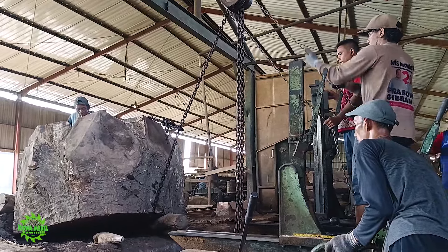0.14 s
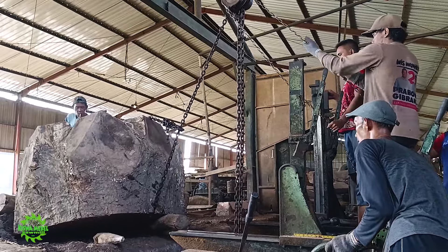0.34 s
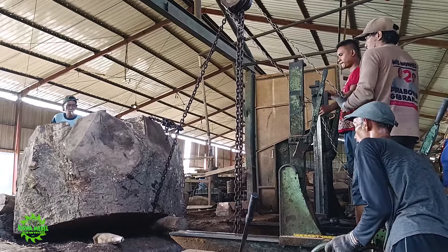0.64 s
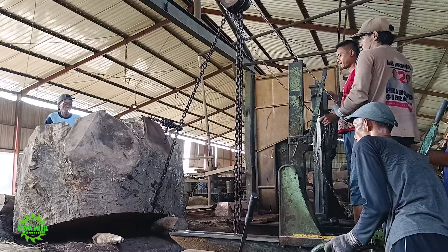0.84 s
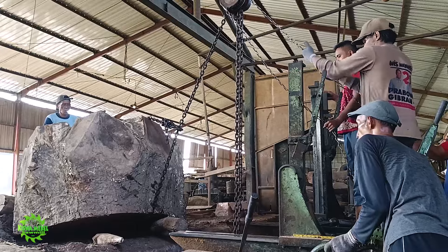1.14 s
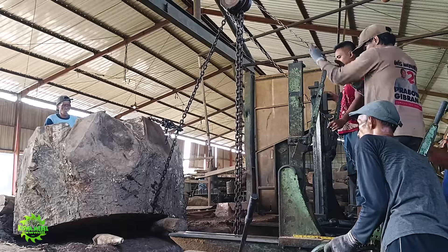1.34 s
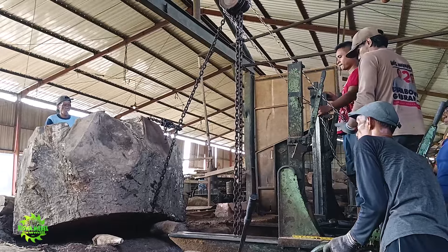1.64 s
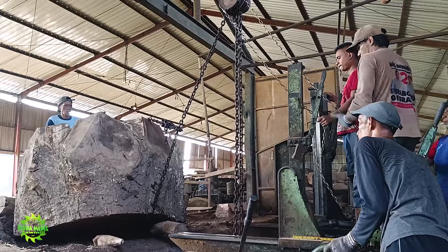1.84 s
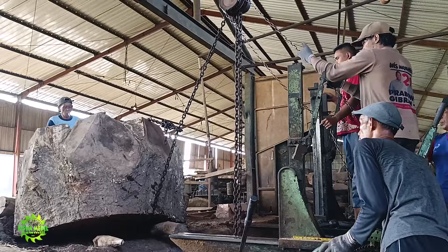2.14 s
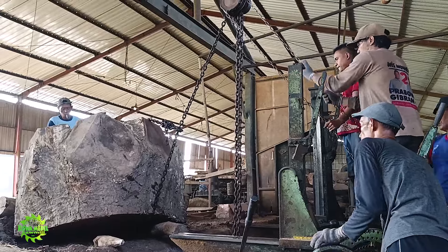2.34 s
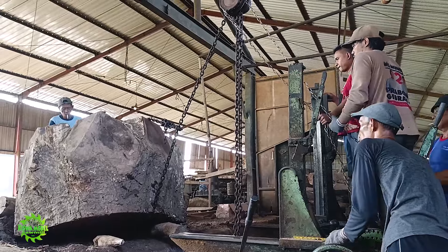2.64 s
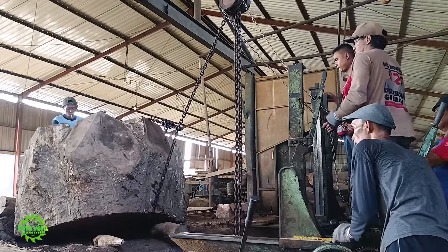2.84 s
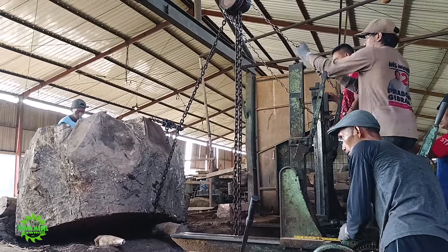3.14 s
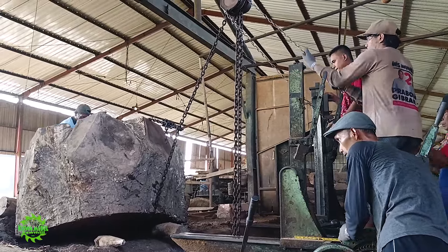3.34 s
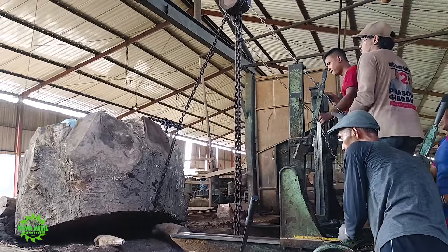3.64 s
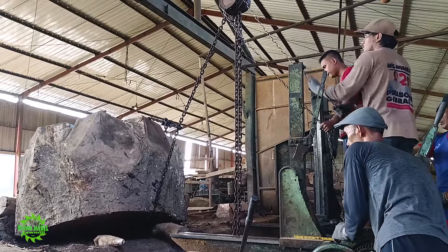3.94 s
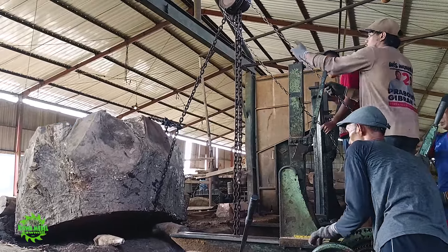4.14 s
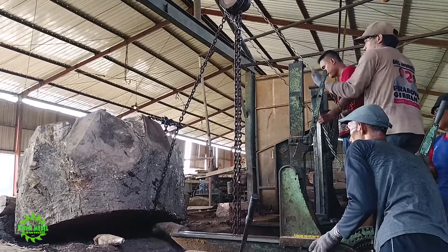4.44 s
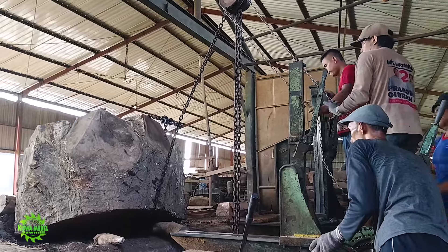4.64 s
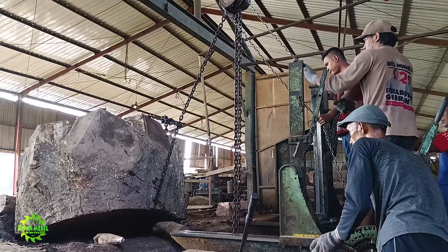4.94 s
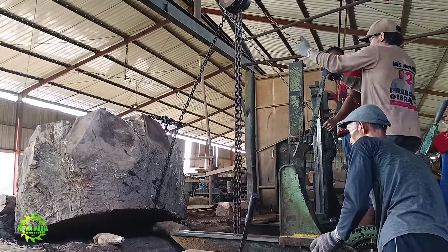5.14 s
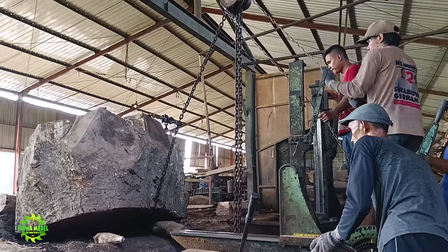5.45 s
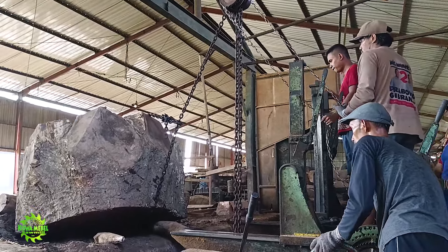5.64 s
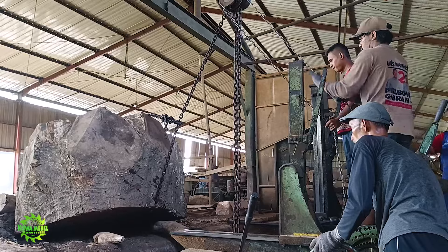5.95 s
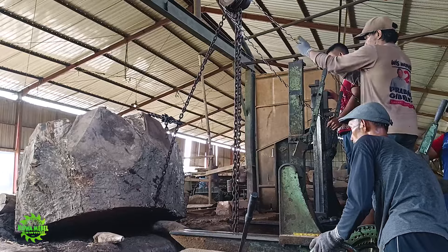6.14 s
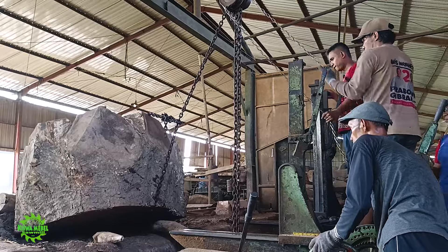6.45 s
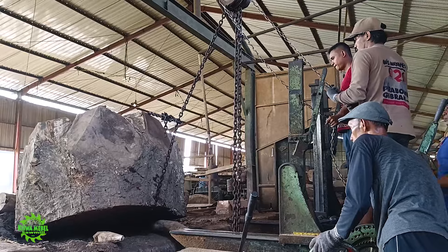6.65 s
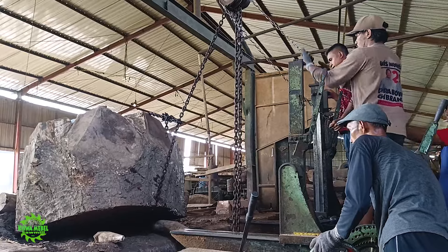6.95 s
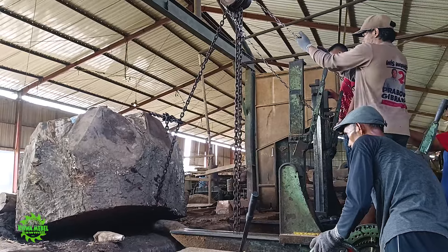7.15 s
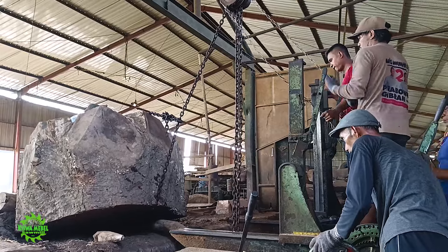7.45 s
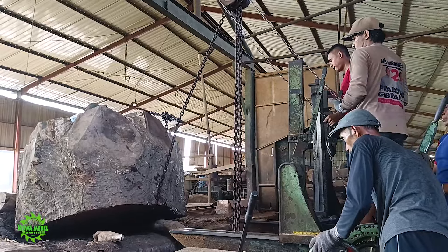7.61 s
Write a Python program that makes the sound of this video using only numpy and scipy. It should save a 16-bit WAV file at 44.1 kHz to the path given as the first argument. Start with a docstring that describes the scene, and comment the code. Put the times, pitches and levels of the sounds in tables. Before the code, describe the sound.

A steel chain rattles through a hand hoist in eight even pulls, roughly a second apart. Each burst of clatter trails off in clinking loose links and a short gear rumble, with a slight echo from the shed. A faint, very high hiss flares now and then over the low hum of mill machines, and three quick ticks come close on the right late on.

```python
"""In an open sawmill shed, a worker hauls the hand chain of a hoist once a second to lift a big log.
The links clatter over the wheel and shake its steel housing, the slack chain jingles and clinks between
pulls, and the gears rumble on after each pull. A thin, high hiss comes and goes, machines hum low,
and three sharp ticks sound right beside the right microphone."""
import sys
import numpy as np
from scipy import signal
from scipy.fft import rfft, irfft, next_fast_len
from scipy.io import wavfile
from scipy.ndimage import uniform_filter1d, map_coordinates

SR = 44100
rng = np.random.default_rng(int(sys.argv[2]) if len(sys.argv) > 2 else 0)


def store_wav(level_fs):
    """Save 16-bit WAV to argv[1]."""
    pcm = np.round(np.clip(np.atleast_2d(level_fs), -1, 1) * 32767)
    wavfile.write(sys.argv[1], SR, pcm.T.astype(np.int16))


N = 343098

# pulls on the hand chain: start_s, length_s, clatter_db, jingle_db, rumble_db, grab_db
HAULS = [(-0.644, .335, -23, -22.5, -29.5, -49), (0.37, .30, -20, -22.5, -31, -51),
         (1.298, .40, -21, -24, -32.5, -51.5), (2.332, .31, -23, -24, -28.5, -43.5),
         (3.325, .285, -21.5, -24, -30.5, -53.5), (4.311, .30, -21, -24, -32.5, -50),
         (5.306, .37, -21.5, -24, -31.5, -43), (6.288, .26, -21.5, -23.5, -31, -51),
         (7.27, .25, -20, -22, -31.5, -43.5)]


def chain():
    """The running chain and its knocks shake the housing and ring the links; the slack rings longer."""
    # single knocks of the chain on the hoist: time_s, housing_db, links_db
    knocks = [(0.121, -43.0, -45.0), (0.187, -31.0, -36.0), (0.309, -24.0, -32.0), (0.428, -18.5, -33.0),
              (0.589, -12.0, -30.5), (0.722, -18.0, -32.5), (0.872, -30.0, -26.0), (1.102, -30.0, -30.0),
              (1.265, -30.0, -38.0), (1.361, -17.5, -26.0), (1.551, -14.0, -32.5), (1.625, -13.0, -24.5),
              (2.086, -34.0, -41.5), (2.193, -24.0, -39.5), (2.375, -20.0, -24.5), (2.6, -16.0, -22.5),
              (2.775, -16.0, -28.5), (3.113, -24.0, -31.5), (3.306, -31.5, -37.0), (3.39, -29.0, -31.0),
              (3.473, -15.0, -24.5), (3.768, -22.5, -22.0), (4.147, -28.5, -35.0), (4.273, -27.0, -32.5),
              (4.303, -22.0, -26.5), (4.324, -25.0, -26.0), (4.387, -22.0, -27.5), (4.433, -14.0, -25.5),
              (4.645, -17.0, -18.5), (4.969, -37.5, -41.5), (5.163, -31.0, -37.5), (5.242, -22.0, -24.0),
              (5.334, -17.5, -23.5), (5.443, -13.0, -27.5), (5.647, -13.0, -21.5), (5.882, -33.5, -32.0),
              (6.083, -38.0, -41.0), (6.196, -29.5, -49.5), (6.304, -26.0, -30.0), (6.372, -18.0, -24.5),
              (6.507, -14.0, -22.5), (6.63, -17.0, -29.5), (6.884, -38.0, -39.0), (7.077, -34.5, -48.0),
              (7.214, -29.0, -39.5), (7.255, -15.5, -24.0), (7.326, -19.5, -24.5), (7.371, -16.0, -27.5)]
    # the slack swings against itself as a pull ends: time_s, clash_db, ring_db
    swings = [(0.761, -27, -29.5), (0.847, -32.5, -34.5), (1.674, -30, -30), (1.719, -20, -18.5),
              (2.709, -24, -30), (2.757, -23.5, -28.5), (3.706, -25, -26.5), (5.68, -20.5, -25.5),
              (6.615, -22, -30), (7.564, -19.5, -23.5), (7.619, -25.5, -27.5)]
    # ringing notes of the steel housing: pitch_hz, width_hz, level_db
    housing_notes = [(462.5, 31, -1), (513.7, 28.2, 3.5), (596.4, 52, -2.5), (739, 86, -3.5),
                     (858, 63, -.5), (1113, 71, -3.5), (1183, 33, -4), (1269, 76, -1), (1579, 100, -8),
                     (1755, 60, -10)]
    # of the chain guide beside the wheel: pitch_hz, width_hz, level_db
    guide_notes = [(1812, 47, -3), (2159, 96, 1), (2376, 47, 1.5), (2683, 63, 0), (3420, 78, -6.5)]
    # of the free-hanging links: pitch_hz, width_hz, level_db
    slack_notes = [(3255, 72, 3), (3448, 69, -2), (3775, 49, -3), (4840, 39, -11.5), (5360, 60, -4.5),
                   (6500, 46, -10.5), (6730, 27, 2), (6900, 28, -7), (7400, 36, -3.5), (8390, 40, -20),
                   (8540, 24, -11), (9230, 46, -8.5), (10660, 50, -17)]
    knock_s, housing_db, links_db = np.transpose(knocks)
    swing_s, clash_db, ring_db = np.transpose(swings)
    clatter_db, jingle_db = chain_motion()
    beat = link_beat(clatter_db, links_per_second=42, scatter=.35, spread_db=1.0, fade_s=0.14, scrape=0.23)
    # each knock shakes the housing and rings the links, over the running chain's clatter
    clatter = np.hypot(amp(clatter_db) * beat, bursts(knock_s, amp(housing_db), fade_s=0.055))
    clash = bursts(swing_s, amp(clash_db), fade_s=0.16)
    slack_ring = bursts(swing_s, amp(ring_db), fade_s=0.2)
    rise_s = 0.002  # a knock passes from link to link, so it starts softly
    lag = np.exp(-1 / (rise_s * SR))
    knock = signal.lfilter([1 - lag], [1, -lag], bursts(knock_s, amp(links_db), fade_s=0.095))
    jingle = np.sqrt((amp(jingle_db) * beat ** 0.75) ** 2 + knock ** 2 + clash ** 2)
    slack_level = np.hypot(slack_ring, amp(-16) * jingle)
    housing = resonate(clatter * contacts(per_second=5000, spread_db=2.5), housing_notes)
    guide = resonate(amp(-6.5) * jingle * contacts(per_second=3000, spread_db=4), guide_notes)
    slack = resonate(slack_level * contacts(per_second=2500, spread_db=7), slack_notes)
    links = link_ring(jingle * contacts(per_second=6000, spread_db=5), fade_s=0.056, ring_db=-2.5)
    return housing + guide + slack + links


def chain_motion():
    """Clatter and jingle levels in dB: the hand grabs the slack and pulls; the chain never quite rests."""
    # how the wheel follows a pull: delay_s, rise_s, run_on_s, fall_db_per_s
    wheel_timing = (-0.013, 0.114, -0.017, 92)
    # how the swaying links follow it: delay_s, rise_s, run_on_s, fall_db_per_s
    link_timing = (0.0, 0.093, -0.017, 90)
    idle_clatter_db, idle_jingle_db, sway_db = -51, -64, 2.5
    grab_lead_s, grab_width_s, grab_clatter_db = 0.012, 0.112, 3.5
    starts, _, clatter_db, jingle_db, _, grab_db = np.transpose(HAULS)
    t = np.arange(N) / SR
    grab = sum(amp(db) * np.exp(-((t - s + grab_lead_s) / grab_width_s) ** 2)
               for s, db in zip(starts, grab_db))
    sway = amp(sway_db * wobble(11))
    clatter_between = sway * np.hypot(amp(idle_clatter_db), amp(grab_clatter_db) * grab)
    jingle_between = sway * np.hypot(amp(idle_jingle_db), grab)
    clatter = np.hypot(hauled(clatter_db, wheel_timing), clatter_between)
    jingle = np.hypot(hauled(jingle_db, link_timing), jingle_between)
    return 20 * np.log10(clatter), 20 * np.log10(jingle)


def hauled(levels_db, timing):
    """Loudness of one part over all pulls: it speeds up, runs while the hand pulls, then coasts down."""
    delay_s, rise_s, run_on_s, fall_db_per_s = timing
    sag_db_per_s = 2.5  # the arm tires during a pull
    t = np.arange(N) / SR
    power = np.zeros(N)
    for (start, length, *_), db in zip(HAULS, levels_db):
        rise = 1 - np.exp(-(np.maximum(t - start - delay_s, 0) / rise_s) ** 1.3)
        sag_db = sag_db_per_s * np.clip(t - start, 0, length)
        coast_s = np.maximum(t - start - length - run_on_s, 0)
        power += (rise * amp(db - sag_db - fall_db_per_s * coast_s)) ** 2
    return np.sqrt(power)


def link_beat(effort_db, links_per_second, scatter, spread_db, fade_s, scrape):
    """Links drop into the wheel's pockets over a steady scrape, at full rate only on the hardest pull."""
    speed = amp(.2 * (effort_db - effort_db.max()))
    links_passed = np.cumsum(links_per_second * speed) / SR
    jitter, size = rng.standard_normal((int(links_passed[-1]), 2)).T
    times = np.interp(np.arange(len(jitter)) + scatter * jitter, links_passed, np.arange(N) / SR)
    # a slow chain slides more than it knocks
    beat = speed ** 2 * bursts(times, amp(spread_db * size), fade_s) + scrape
    return beat / np.sqrt(np.abs(uniform_filter1d(beat ** 2, size=4000)))  # keep the level near 1


def link_ring(x, fade_s, ring_db):
    """Each contact cracks and sets off the links' many high notes; one link after another takes over."""
    # tone of the steel links: pitch_hz, level_db
    link_tone = [(300, -44), (1000, 3.5), (2000, -2), (3300, 0.5), (4200, -2), (5400, -2.5), (6800, -6),
                 (7700, -13.5), (9300, -12.5), (10500, -20.5), (13000, -28.5), (16000, -48)]
    t = np.arange(SR // 4) / SR
    handover = 2 * wobble(8)
    ringing = 0
    for share in (np.cos(handover), np.sin(handover)):
        ring = rng.standard_normal((2, len(t))) * amp(-60 * t / fade_s)
        ring /= np.linalg.norm(ring[0])
        ringing = ringing + signal.fftconvolve(x * share, ring, axes=1)[:, :N]
    return coloured((x + amp(ring_db) * ringing) / np.hypot(1, amp(ring_db)), link_tone)


def contacts(per_second, spread_db):
    """Two streams of tiny steel-on-steel touches of unequal size."""
    touch = rng.random((2, N)) < per_second / SR
    direction = np.sign(rng.standard_normal((2, N)))
    size = amp(spread_db * np.clip(rng.standard_normal((2, N)), -2, 2))
    return unit(touch * direction * size)


def bursts(times, sizes, fade_s):
    """Loudness curve of blows that each set off a chatter, dying by 60 dB in fade_s."""
    blows = np.bincount(np.clip(times * SR, 0, N - 1).astype(int), sizes ** 2, N)
    return np.sqrt(signal.lfilter([1], [1, -amp(-120 / (fade_s * SR))], blows))


def gears():
    """Heavy gears start late and rumble on, throbbing as their teeth meet; greased, they make no treble."""
    # how the gears follow a pull: delay_s, rise_s, run_on_s, fall_db_per_s
    gear_timing = (0.12, 0.1, 0.135, 48)
    # ringing notes of the gear case and its beam: pitch_hz, width_hz, level_db
    case_notes = [(86, 21, 0.5), (109.8, 8.3, 4.5), (156.4, 25.6, 1), (202, 33, 2.5), (276.5, 21, -0.5),
                  (322.7, 14.8, 3), (359.4, 26, 1.5), (504, 97, 0), (664, 62, 0), (817, 160, -0.5),
                  (1080, 140, -3), (1400, 260, -8)]
    tooth_hz, cutoff_hz = 38, 1900
    rumble = hauled(np.transpose(HAULS)[4], gear_timing)
    mesh = np.sin(2 * np.pi * tooth_hz * np.arange(N) / SR + 3 * wobble(6))
    throb_db = 2.2 * mesh + .9 * wobble(25)
    teeth = rumble * amp(throb_db) * contacts(per_second=2500, spread_db=1)
    return filtered(resonate(teeth, case_notes), lambda hz: 1 / (1 + (hz / cutoff_hz) ** 4))


def ticks():
    """Tiny knocks beside the right microphone: a sudden push that dies within a cycle, with no echo."""
    # the knocks: time_s, level_db, pitch_hz, cutoff_hz
    taps = [(6.9154, -8.5, 400, 2800), (6.9345, -2.5, 1000, 6700), (6.9573, -11, 504, 7650)]
    out, t = np.zeros(N + SR), np.arange(SR // 50) / SR
    for s, db, hz, cutoff_hz in taps:
        push = -np.cos(2 * np.pi * hz * t) * np.exp(-2 * t * hz)
        softened = signal.lfilter(*signal.butter(4, cutoff_hz, fs=SR), push)
        out[round(s * SR):][:len(t)] += amp(db) * softened
    return out[:N] * amp([[-16], [0]])


def high_hiss():
    """A thin, very high hiss flares up over a faint steady trace."""
    # flares on each pull, weaker ones between: centre_s, half_width_s, level_db
    flares = [(.7, .07, -44), (1.0, .07, -49), (1.6, .11, -42), (2.15, .1, -62), (2.57, .1, -42),
              (3.08, .06, -66), (3.57, .09, -46), (4.02, .04, -56), (4.58, .12, -44), (4.85, .03, -52),
              (5.61, .08, -45), (6.15, .12, -54), (6.52, .11, -49), (6.95, .16, -56), (7.55, .16, -52)]
    idle_db, pitch_hz, half_width_hz = -76, 14330, 280
    t = np.arange(N) / SR
    level = amp(idle_db) + sum(amp(db) * np.exp(-((t - s) / width) ** 2) for s, width, db in flares)
    noise = rng.standard_normal((2, N))
    hiss = filtered(noise, lambda hz: unit(np.exp(-((hz - pitch_hz) / half_width_hz) ** 2)))
    return level * amp(2.5 * wobble(18)) * hiss


def machines():
    """Machines elsewhere in the mill: a dull rush, a deep drone and a slightly unsteady hum."""
    # tone of the rush: pitch_hz, level_db
    rush_tone = [(20, -24), (40, -19), (60, -1), (170, 1.5), (260, -2.5), (400, -10.5), (1000, -21.5),
                 (1400, -18), (2000, -19.5), (3500, -33.5), (7000, -45.5), (11000, -90), (15000, -75)]
    # the drone swells and fades: time_s, level_db
    drone_swells = [(0.0, -63), (0.48, -50), (1.65, -59), (1.88, -50), (2.97, -62), (3.27, -51),
                    (4.53, -60), (4.7, -46), (5.98, -61), (6.17, -44), (6.98, -59), (7.78, -45)]
    # notes of the hum: pitch_hz, level_db
    hum_notes = [(113, -52.5), (156, -51.5), (323, -54), (360.7, -60)]
    drone_hz = 59
    t = np.arange(N) / SR
    drone_db = np.interp(t, *np.transpose(drone_swells))
    rush = amp(-42.5 + wobble(3.02)) * coloured(rng.standard_normal((2, N)), rush_tone)
    drone = amp(drone_db) * np.sin(2 * np.pi * drone_hz * t + 0.6 * wobble(4.6))
    hum = 0
    for hz, db in hum_notes:
        level = amp(db + 2.2 * wobble(4.4)) * np.sqrt(2)
        hum = hum + level * np.sin(2 * np.pi * hz * t + 1.55 * wobble(6))
    return rush + np.array([hum + drone, np.zeros(N)])  # the notes go in the shared stream only


def shed_echo(x):
    """The roof and walls throw the sound back; the treble dies first."""
    # time the echo takes to die by 60 dB: pitch_hz, fade_s
    fade_times = [(150, 0.96), (1000, 0.43), (2500, 0.45), (12000, 0.16)]
    hz, t, noise = signal.stft(rng.standard_normal((2, SR)), SR, nperseg=256)
    fade = amp(-60 * t / along(fade_times, hz)[:, None])
    tail = signal.istft(noise * fade, SR, nperseg=256)[1]
    tail = np.pad(tail / np.linalg.norm(tail[0]), ((0, 0), (SR // 100, 0)))  # arrives 10 ms late
    return signal.fftconvolve(x, tail, axes=1)[:, :N]


def microphones(x, lead_s):
    """Two microphones face different ways; each mixes x's shared first stream with its unrelated second."""
    # which side is louder: pitch_hz, left_minus_right_db
    balance = [(250, -1), (520, -1.5), (850, -7), (1300, -8), (1800, -2.5), (2500, 5), (3200, 5),
               (4200, 17.5), (6500, 3), (8500, 11.5), (10000, 17.5), (13000, 6)]
    # how alike the sides sound: pitch_hz, likeness (0 to 1)
    likeness = [(100, 0.98), (400, 0.84), (800, 0.69), (1300, 0.24), (2000, 0.083), (8000, 0.11)]

    def pickup(hz, side):
        alike = along(likeness, hz)
        lean = amp(along(balance, hz) / 2)
        angle = np.arccos(alike) / 2
        shares = np.array([np.cos(angle), side * np.sin(angle)])
        phase = 2 * np.pi * lead_s * np.maximum(hz - 700, 0)  # the left hears the treble first
        centre_level = np.sqrt(lean ** 2 + lean ** -2 + 2 * alike * np.cos(phase)) / 2
        return shares * lean ** side / centre_level * np.exp(.5j * phase * side)
    return np.array([filtered(x, lambda hz: pickup(hz, side)).sum(axis=0) for side in (1, -1)])


def amp(db):
    """Turn decibels into a multiplier."""
    return 10 ** (np.asarray(db) / 20)


def unit(x):
    """Scale x to an average power of 1."""
    return x / np.sqrt(np.mean(np.abs(x) ** 2) + 1e-20)


def along(points, hz):
    """Read between (pitch_hz, value) points on a musical (log) scale."""
    pitches, values = np.transpose(points)
    return np.interp(np.log(hz + 1), np.log(pitches + 1), values)


def wobble(per_second):
    """A smooth curve through random points, per_second of them each second."""
    points = rng.standard_normal(int(N * per_second / SR) + 4)
    at = np.arange(0, N, 64)
    return np.interp(np.arange(N), at, map_coordinates(points, [at * per_second / SR]))


def filtered(x, response):
    """Multiply each frequency in x by response(hz)."""
    size = next_fast_len(N + SR // 2)
    return irfft(rfft(x, size) * response(np.fft.rfftfreq(size, 1 / SR)), size)[..., :N]


def coloured(x, tone):
    """Give white noise x a tone, keeping its power."""
    return filtered(x, lambda hz: unit(amp(along(tone, hz))))


def resonate(x, notes):
    """Let white noise x ring a body's notes, keeping its power."""
    def response(hz):
        return unit(sum((-1) ** k * amp(db) * 1j * hz * width / (pitch ** 2 - hz ** 2 + 1j * hz * width)
                        for k, (pitch, width, db) in enumerate(notes)))
    return filtered(x, response)


def scene():
    """The hoist in the shed over the mill's hum."""
    hoist = chain() + gears()
    mill = hoist + amp(-11) * shed_echo(hoist) + machines() + high_hiss()
    return microphones(mill, lead_s=.00007) + ticks()


def record(dry):
    """Cut off the very highest treble."""
    top_hz = 15950
    return filtered(dry, lambda hz: hz < top_hz)


dry = scene()
out = record(dry)
store_wav(out)
```